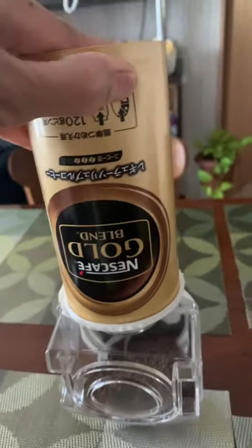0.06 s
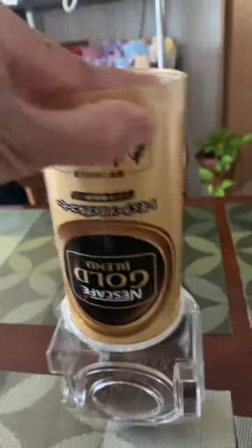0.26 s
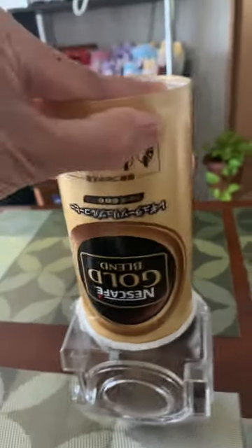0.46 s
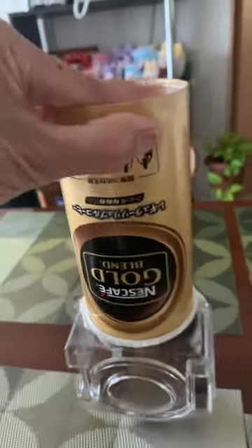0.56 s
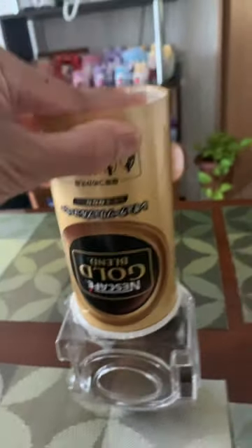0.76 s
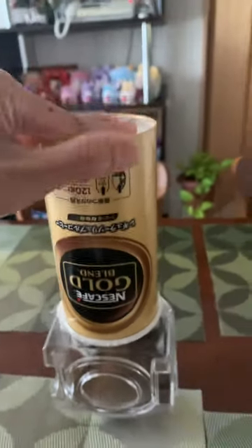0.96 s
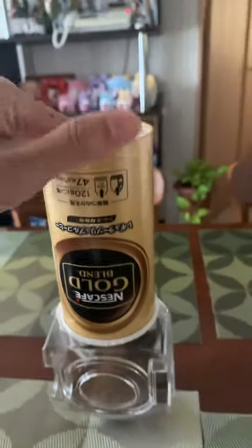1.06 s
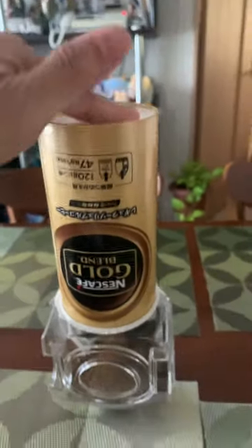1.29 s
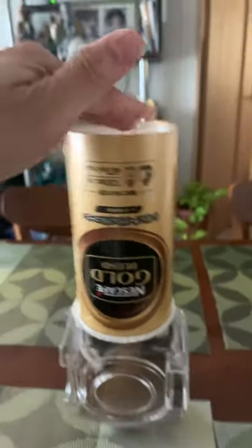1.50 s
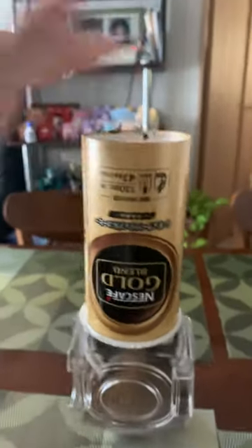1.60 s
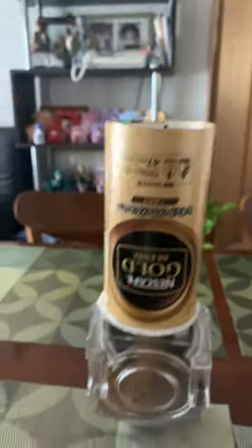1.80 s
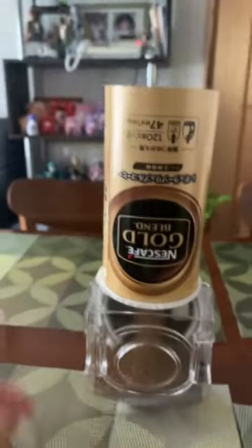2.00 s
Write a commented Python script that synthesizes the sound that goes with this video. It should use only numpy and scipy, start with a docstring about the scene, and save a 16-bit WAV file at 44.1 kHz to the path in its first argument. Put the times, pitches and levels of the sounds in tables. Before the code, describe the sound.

Close to the microphone in a small room, a refill tube's seal cracks loudly and a plastic jar knocks the table. The cardboard creaks quietly, the rim ticks, and granules start trickling in with a faint hiss.

```python
"""A small room, one microphone close to a plastic jar on a table.
A cardboard refill tube of instant coffee is pressed down onto the jar. Its seal gives way in a burst
of cracks that set the jar ringing, and the jar thumps the table. The tube creaks under the fingers and
the rim ticks; then the hand lets go and the granules run in, their tiny impacts making a soft hiss."""
import sys
import numpy as np
from scipy import signal
from scipy.fft import rfft, irfft
from scipy.io import wavfile
from scipy.ndimage import uniform_filter1d

SR = 44100
rng = np.random.default_rng(int(sys.argv[2]) if len(sys.argv) > 2 else 0)


def file_out(sig):
    """Save sig as 16-bit WAV at sys.argv[1]."""
    # one column per channel
    cols = np.atleast_2d(sig).T
    # limit, then scale
    lim = np.clip(cols, -1, 1)
    pcm = np.round(lim * 32767).astype(np.int16)
    wavfile.write(sys.argv[1], SR, pcm)


N = 90404
T = np.arange(N) / SR

# Snaps. Each row: start in seconds, relative level in dB, t60 in seconds, treble tilt in dB per octave.
SEAL_CRACKS = [(0.2285, -11, 0.017, 1), (0.2319, -2, 0.034, -1), (0.2364, 0.5, 0.016, 2.5),
               (0.2396, 8.5, 0.017, -1), (0.2434, 2.5, 0.019, -5), (0.2524, -10, .008, -3.5),
               (0.2600, -12.5, 0.017, 3.5), (0.2617, -2, .016, 0.2), (0.2973, 0, 0.014, 0.7)]  # the seal breaks and the tube seats
WALL_CREAKS = [(0.0335, -31, 0.02, 0), (0.0820, -44, 0.019, 4), (0.1440, -52, .012, -12),
               (0.4730, -25.5, 0.03, 0.8), (0.5603, -27.5, 0.012, -2), (0.5805, -36.5, 0.03, -4.5),
               (0.5843, -31, 0.014, 1), (0.5945, -37, 0.01, 1.5), (0.6730, -30, 0.015, -0.5),
               (0.6812, -28, 0.019, 1.5), (0.8533, -25.5, 0.021, 0.5), (0.8560, -30, .012, 0),
               (1.1487, -36.5, 0.02, -2.5), (1.2380, -27.5, 0.021, 1.8), (1.2412, -29.5, .012, 0.4),
               (1.3060, -40.5, 0.045, -1.5), (1.4250, -36.5, 0.053, -3.5), (1.5040, -33, .018, -4.5),
               (2.0350, -32, 0.13, -.5)]  # the cardboard buckles under the fingers
RIM_TICKS = [(0.9378, -34.5, 0.029, 1.7), (1.0718, -43, .012, 1), (1.0736, -41.5, 0.0067, 0),
             (1.1707, -36.5, 0.018, -0.5)]  # the plastic rim settles
# The jar knocks or presses on the table. Each row: start in seconds, level in dB, contact in seconds.
JAR_THUMPS = [(0.2333, -7, 0.0034), (0.2399, 0, .004), (0.2964, -9, 0.0031), (0.472, -31, 0.0017),
              (0.818, -23.5, 0.015), (0.938, -28.5, 0.016), (1.528, -31, .001), (1.589, -35, 0.0021)]
# The hand shifts on the tube. Each row: peak time in seconds, level in dB, rise and fall in seconds.
GRIP_SHIFTS = [(0.043, -51, 0.012, 0.039), (0.41, -52, 0.022, 0.036), (0.59, -61, 0.045, 0.037),
               (0.86, -56.5, 0.017, 0.081), (0.958, -56.5, 0.036, 0.04), (1.27, -60.5, 0.066, 0.042),
               (1.561, -51.5, 0.052, 0.04), (1.8, -63.5, 0.032, 0.023), (2.0, -58.5, 0.014, 0.12)]

# Level curves. Each row: time in seconds, level in dB.
GRANULE_FLOW = [(0.2, -80), (0.4, -58), (0.62, -67.5), (0.8, -92.5), (1.40, -89.5), (1.44, -66.5),
                (1.455, -55), (1.495, -51), (1.52, -56), (1.55, -50), (1.60, -55.5), (1.67, -58),
                (1.71, -55), (1.76, -50), (1.82, -52.5), (1.87, -50), (1.915, -57), (1.955, -54),
                (2.0, -60), (2.05, -63.5)]
RUB_LEVEL = [(0.2, -69.5), (0.4, -58), (0.5, -63.5), (0.75, -64.5), (0.83, -65.5), (0.92, -62.5),
             (0.96, -74.5), (1.03, -73), (1.10, -72), (1.2, -65.5), (1.35, -71), (1.45, -66.5)]  # the tube rubbing in the rim

# Ringing modes. Each row: frequency in Hz, relative level in dB, t60 in seconds.
JAR_MODES = [(314.8, -53.5, .22), (382, -46.5, .22), (610, -46, .16), (623, -48, 0.12), (756, -44.5, .17),
             (965, -48, 0.22), (1003, -45.5, .18), (1148, -44.5, 0.29), (1320, -46, 0.15), (1328, -43, .2),
             (1475, -46.5, .15), (1545, -41.5, 0.082), (1670, -43, .18), (2560, -42, .12), (2875, -44, .13),
             (3100, -48.5, .16), (3180, -41.5, .15)]  # jar and tube
TABLE_MODES = [(48, -31.5, 0.63), (100.7, -14.5, .2), (122, -14.5, 0.08), (146.4, -27, 0.37),
               (160.3, -29, 0.39), (211.5, -33, 0.47), (244.2, -21, 0.21), (348, -32.5, .25)]  # table and hollow tube
WALL_MODES = [(920, -43, 0.027), (963, -42.5, 0.042), (1654, -42.5, 0.039), (2940, -42.5, 0.017)]  # cardboard wall
RIM_MODES = [(3000, -40, 0.027), (4350, -40, .025), (5000, -45, 0.028), (5650, -48, .025)]  # plastic rim

# The colour of each sound at the microphone. Each row: frequency in Hz, relative level in dB.
CRACK_COLOUR = [(60, -21), (160, -9), (380, -4), (570, -4), (670, -7), (765, -2), (1000, 2), (1250, 2),
                (1560, 3.5), (1800, -3), (2350, -3.5), (2850, -2.5), (3250, -4.5), (3550, -10.5),
                (4050, -7.5), (4800, -9), (5300, -15), (5900, -12), (7500, -19), (10000, -26.5),
                (13000, -29.5), (16000, -34.5)]
CREAK_COLOUR = [(80, -24), (300, -10), (600, -9), (900, 4.5), (1200, -2), (1550, -4), (2200, -4.5),
                (4500, -13), (7000, -20), (10000, -32), (16000, -43.5)]
TICK_COLOUR = [(200, -19), (900, -8), (2000, -7), (3500, -1.5), (4800, 3), (6000, -1.5), (7000, -11.5),
               (10000, -19), (12500, -20), (16000, -23)]
POUR_COLOUR = [(150, -20.5), (500, -3), (950, 3.5), (1600, 2), (2600, -1), (4000, 0.5), (6000, 1),
               (9000, -1), (11500, -4), (16000, -7)]
GRIP_COLOUR = [(25, -27), (48, -13), (70, -8.5), (105, 0), (145, 6.5), (180, -10.5), (240, -3), (330, -8.5),
               (600, -16), (1000, -11), (2000, -20), (6000, -55)]
RUB_COLOUR = [(300, -15.5), (1000, -9), (2500, -6.5), (4000, -5), (5000, -0.5), (6300, -6), (8000, -14),
              (16000, -37.5)]
TAIL_COLOUR = [(100, 3), (400, -5), (1000, -5.5), (2500, -7), (6000, -2), (14000, 3.5)]
ROOM_TONE_COLOUR = [(25, -21.5), (60, -6), (100, -2), (145, 8), (190, -6.5), (300, -7.5), (600, -11),
                    (950, -7.5), (1500, -9.5), (3000, -23), (6000, -38.5), (10000, -43), (16000, -46)]

# The room's decay. Each row: band centre in Hz, t60 in seconds (below zero, the band has no tail).
TAIL_T60 = [(100, -0.04), (400, 0.53), (1000, 0.32), (2500, 0.3774), (6000, 0.3535), (10000, 0.28),
            (16000, 0.28)]


def seal():
    """The seal gives way in a quick run of cracks, the loudest thing at the microphone."""
    return snaps(SEAL_CRACKS, CRACK_COLOUR, gain_db=8)


def jar_ring(cracks):
    """The cracks set the jar and the tube ringing."""
    return from_db(-14) * through(cracks, ringing(JAR_MODES))


def table_thumps():
    """Soft knocks of the jar ring the low modes of the table; a longer contact sounds duller."""
    force = np.zeros(N)
    for start, db, contact_s in JAR_THUMPS:
        push = np.sin(np.pi * np.minimum(T / contact_s, 1)) ** 2
        add(force, start, from_db(db) * push / push.sum())
    return through(force, ringing(TABLE_MODES))


def tube_creaks():
    """The cardboard wall buckles under the fingers and rings briefly."""
    creaks = snaps(WALL_CREAKS, CREAK_COLOUR, gain_db=10)
    return creaks + through(creaks, ringing(WALL_MODES))


def rim_ticks():
    """The plastic rim settles in bright ticks, each with a short ring."""
    ticks = snaps(RIM_TICKS, TICK_COLOUR, gain_db=13.5)
    return ticks + through(ticks, ringing(RIM_MODES))


def granules(grains_per_s=15000, spread_db=2.5):
    """Thousands of tiny impacts in the jar merge into a hiss, as loud as the flow is strong."""
    sizes = from_db(spread_db * np.minimum(rng.exponential(1, N), 5))
    signs = rng.choice([-1, 1], N)
    landed = rng.random(N) < grains_per_s / SR
    impacts = unit(sizes * signs * landed) * np.sqrt(N)  # rms one
    return through(impacts * fader(GRANULE_FLOW), response(POUR_COLOUR))


def hand():
    """Dull swells as the grip shifts, and a faint rub of the tube in the rim."""
    grip = np.zeros(N)
    for peak, db, rise, fall in GRIP_SHIFTS:
        width = np.where(T < peak, rise, fall)
        grip += from_db(db) * np.exp(-((T - peak) / width) ** 2)
    return grip * noise(GRIP_COLOUR) + fader(RUB_LEVEL) * noise(RUB_COLOUR)


def room_response(onset_s=0.0073):
    """Early reflections off the table and a diffuse tail that dies band by band."""
    hz = np.arange(N // 2 + 1) * SR / N
    spectrum = rfft(rng.standard_normal(N)) * from_db(at_hz(TAIL_COLOUR, hz))
    tail = np.zeros(N)
    for centre, t60 in TAIL_T60:
        band = at_hz([(f, float(f == centre)) for f, _ in TAIL_T60], hz)
        tail += irfft(spectrum * band, N) * unit(decay(t60))
    early = from_db(-15) * unit(rng.standard_normal(N) * decay(t60=0.075))
    onset = 1 - np.exp(-(T / onset_s) ** 2)
    return (tail + early) * onset


def room_tone():
    """The faint, low, steady background of the room."""
    return from_db(-63) * noise(ROOM_TONE_COLOUR)


def snaps(rows, colour, gain_db):
    """Each snap is a brief rattle in a thin wall, with its own brightness."""
    out = np.zeros(N)
    for start, db, t60, tilt_db in rows:
        snap = unit(through(rattle(t60), response(colour, tilt_db)))
        add(out, start, from_db(db + gain_db) * snap)
    return out


def rattle(t60, rise_s=0.00045, evenness=0.75, size=4096):
    """A burst of dense vibration that builds and dies, evened out so that it favours no pitch."""
    attack = 1 - np.exp(-(T + 1 / SR) / rise_s)
    envelope = (attack * decay(t60))[:size]
    burst = rng.standard_normal(size) * envelope
    for _ in range(25):  # hold it to the envelope, then level its spectrum
        local_rms = np.sqrt(np.abs(uniform_filter1d(burst ** 2, size=32)) + 1e-14)
        spectrum = rfft(burst * envelope / local_rms)
        burst = irfft(spectrum / (np.abs(spectrum) + 1e-12) ** evenness)
    return unit(burst * (T[:size] < 2 * t60))


def ringing(modes):
    """Impulse response of a struck body: dying sines of alternating sign."""
    return sum((-1) ** k * from_db(db) * decay(t60) * np.sin(2 * np.pi * hz * T)
               for k, (hz, db, t60) in enumerate(modes))


def response(colour, tilt_db=0, size=8192):
    """Causal impulse response of energy one, with the given colour and tilt per octave."""
    hz = np.arange(size // 2 + 1) * SR / size
    octaves = np.log2(np.maximum(hz, 400) / 1500)
    gain = from_db(at_hz(colour, hz) + tilt_db * octaves)
    cepstrum = irfft(np.log(gain))
    cepstrum[1:size // 2] *= 2  # fold onto positive time for minimum phase
    cepstrum[size // 2 + 1:] = 0
    return unit(irfft(np.exp(rfft(cepstrum))))


def noise(colour):
    """Coloured noise of rms one."""
    return through(rng.standard_normal(N), response(colour))


def decay(t60):
    """Exponential fall of 60 dB in t60 seconds."""
    return np.exp(-np.log(1000) * T / max(t60, 1e-4))


def fader(curve):
    """Gain at each sample along a level curve."""
    return from_db(np.interp(T, *np.transpose(curve)))


def at_hz(points, hz):
    """Read a table on a log-frequency axis."""
    freqs, values = np.transpose(points)
    return np.interp(np.log(np.maximum(hz, 1)), np.log(freqs), values)


def through(x, impulse_response):
    """Pass a sound through an impulse response."""
    return signal.fftconvolve(x, impulse_response)[:N]


def add(out, start_s, x):
    """Mix a sound in at a time."""
    i = int(start_s * SR)
    out[i:i + len(x)] += x[:N - i]


def unit(x):
    """Scale to an energy of one."""
    return x / np.sqrt(np.sum(x ** 2) + 1e-20)


def from_db(db):
    """Decibels to gain."""
    return 10 ** (np.asarray(db) / 20)


def scene():
    """All that reaches the microphone, in mono; the cracks, creaks and ticks also echo in the room."""
    cracks = seal()
    creaks_and_ticks = tube_creaks() + rim_ticks()
    echo = through(from_db(-1) * cracks + from_db(2) * creaks_and_ticks, room_response())
    direct = cracks + jar_ring(cracks) + table_thumps() + creaks_and_ticks + granules() + hand()
    return (direct + echo + room_tone())[None]


def record(dry, low_cut_hz=46, ceiling=1.1, high_cut_hz=15800):
    """The microphone loses the deepest bass; the highest peaks are rounded and the top is cut."""
    low_cut = signal.butter(4, low_cut_hz, "high", fs=SR, output="sos")
    high_cut = signal.ellip(12, 0.1, 85, high_cut_hz, fs=SR, output="sos")
    rounded = ceiling * np.tanh(signal.sosfilt(low_cut, dry) / ceiling)
    return signal.sosfilt(high_cut, rounded)


dry = scene()
out = record(dry)
file_out(out)
```